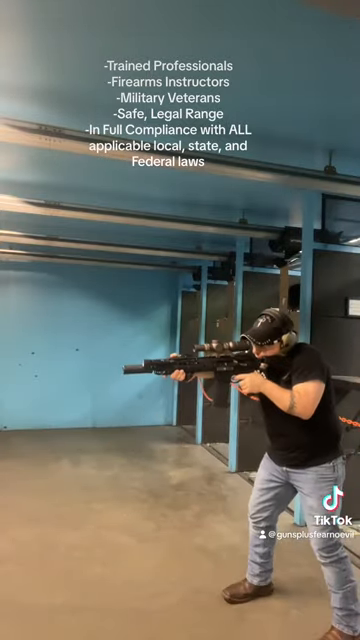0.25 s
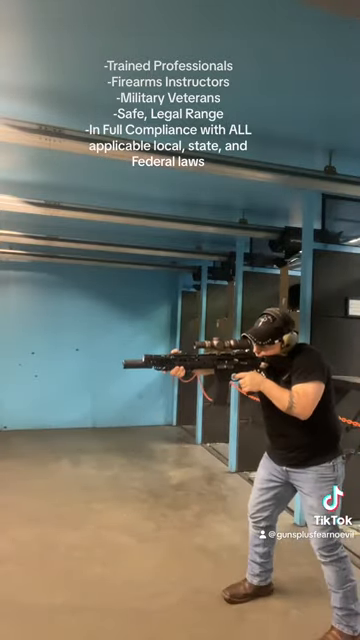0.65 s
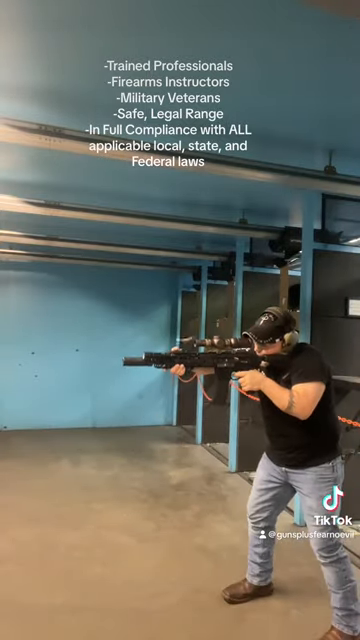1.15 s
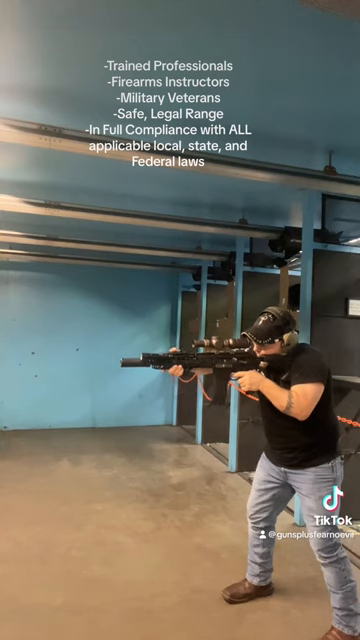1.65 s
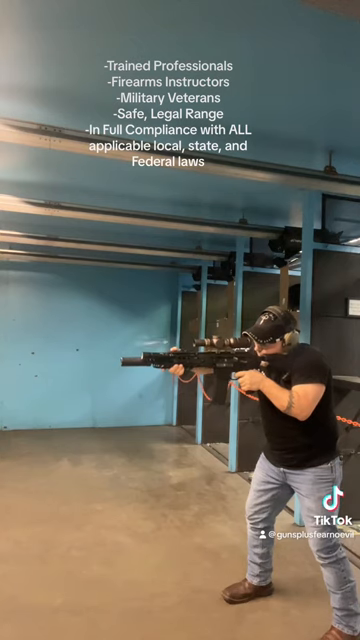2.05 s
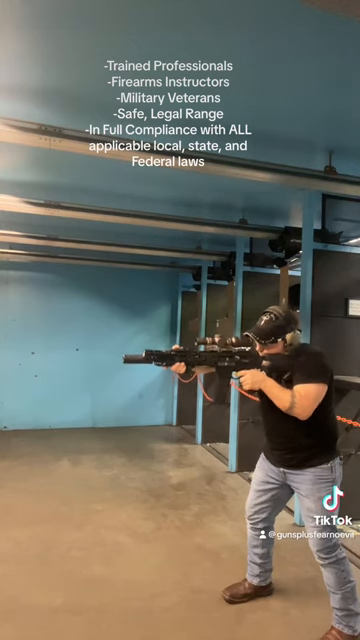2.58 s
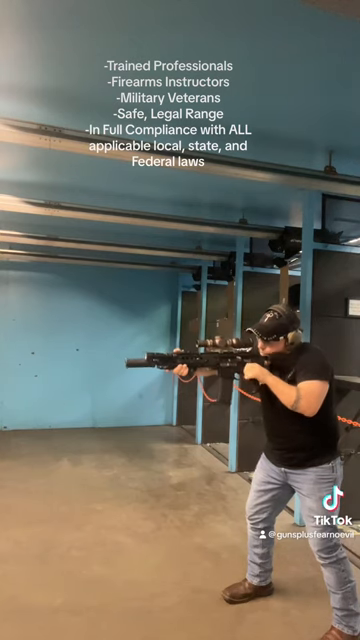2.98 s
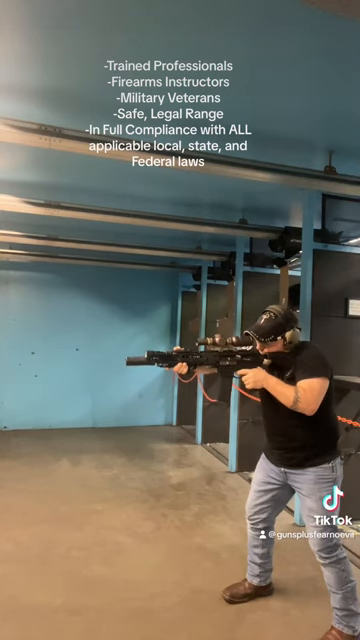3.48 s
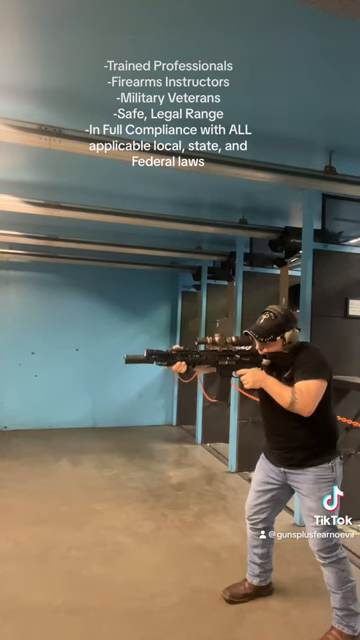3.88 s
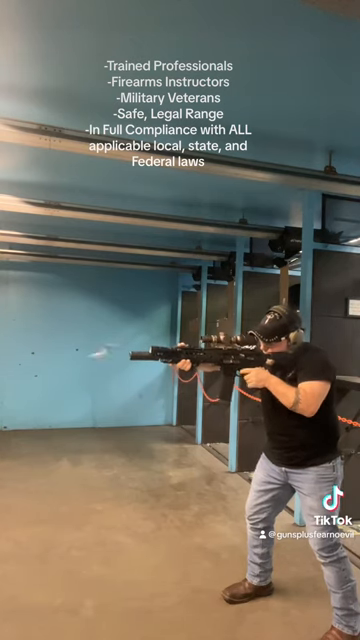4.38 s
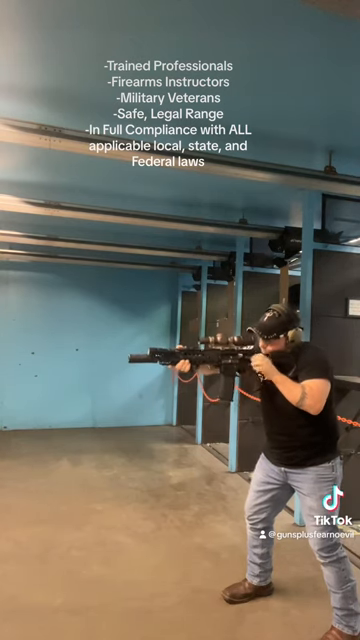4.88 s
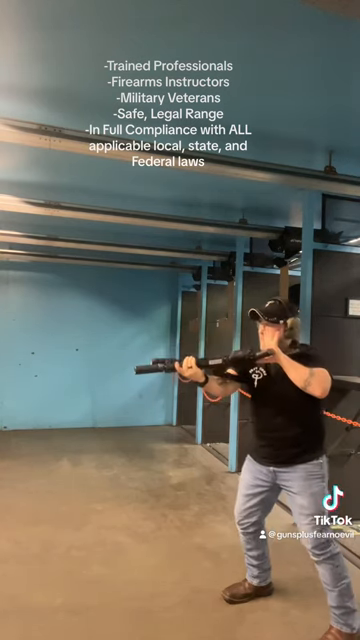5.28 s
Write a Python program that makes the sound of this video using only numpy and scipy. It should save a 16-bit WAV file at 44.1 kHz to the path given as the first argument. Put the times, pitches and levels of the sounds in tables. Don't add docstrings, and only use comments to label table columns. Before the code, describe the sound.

Six suppressed rifle shots in an enclosed concrete range, heard through one mono microphone with automatic gain. First come ventilation rumble and a fading bolt clack; the first crack cuts both to a faint hush. Four shots come roughly half a second apart, then after a longer gap two come close together. Dense echoes bloom and decay, metal baffles ring and beat, and high brass cases click and ping, most clearly near the end.

```python
import sys
import numpy as np
from scipy import signal
from scipy.io import wavfile

SR = 44100
rng = np.random.default_rng(int(sys.argv[2]) if len(sys.argv) > 2 else 0)


def log_audio(samples):
    frames = np.atleast_2d(samples).T
    limited = np.clip(frames, -1, 1)
    pcm = np.round(limited * 32767).astype(np.int16)
    wavfile.write(sys.argv[1], SR, pcm)


def gain_from_db(level_db):
    decades = np.asarray(level_db, float) / 20
    return 10 ** decades


N = 243736
MUZZLE_S = .99745
ECHO_LENGTH = 65000
ROUGH_AIR = rng.standard_normal((2, N))


def table(rows, hz):
    at, *columns = np.transpose(rows)
    return [np.interp(np.log(hz), np.log(at), column) for column in columns]


def rms_one(x):
    return x / np.sqrt(np.mean(x ** 2) + 1e-20)


def since(s):
    return np.maximum(np.arange(N) / SR - s, 0)


def add(out, s, sound):
    first = round(s * SR)
    out[first:first + len(sound)] += sound[:N - first]


def band_noise(low_hz, high_hz, white):
    return signal.sosfilt(signal.butter(2, [low_hz, high_hz], "band", fs=SR, output="sos"), white)


def bands():
    edges = 20 * 2 ** np.arange(0, 9.9, 1 / 3)
    for k, (low, high) in enumerate(zip(edges, edges[1:])):
        yield np.sqrt(low * high), band_noise(low, high, ROUGH_AIR[k % 2])


def colored(spectrum):
    return sum(gain_from_db(table(spectrum, hz)[0]) * noise for hz, noise in bands())


def narrow(hz, width_hz, size):
    r = np.exp(-np.pi * width_hz / SR)
    section = [1, 0, -1, 1, -2 * r * np.cos(2 * np.pi * hz / SR), r * r]
    noise = rng.standard_normal(size + 4000)
    return rms_one(signal.sosfilt([section, section], noise)[4000:])


def resonances(rows):
    return sum(gain_from_db(db) * narrow(hz, width_hz, N) for hz, width_hz, db in rows)


def tick(hz, wide, t60):
    t = np.arange(9000) / SR
    noise = band_noise(hz / wide, min(hz * wide, .45 * SR), rng.standard_normal(len(t)))
    return rms_one(noise) * (gain_from_db(-60 * t / t60) + gain_from_db(-17 - 60 * t / .33))


def gain_before_blast():
    return gain_from_db(-2500 * since(MUZZLE_S))


# pitch in Hz, level in dB per Hz.
FAN_RUMBLE = [(12, -45), (20, -13), (86, -0.5), (123, -4.5), (234, -13), (285, -23), (459, -24), (698, -33),
              (923, -33), (1060, -48), (1150, -35), (1660, -36), (2260, -40), (9950, -59.5), (16000, -74.5)]
# pitch in Hz, width in Hz, level in dB.
DUCT_HUMS = [(85.5, 4.2, -8.5), (130.2, 7.5, -11.5), (182.4, 16, -9), (204.7, 15, -12), (236.3, 6, -7),
             (885, 27, -31)]
# pitch in Hz, level in dB per Hz.
FAN_HUSH = [(18, -49), (30, -10), (92, -1), (123, -18), (198, 5.5), (257, -21), (334, -13), (636, -29.5),
            (1160, -7), (1300, -12), (1400, -5.5), (2250, -22.5), (9000, -51), (11700, -80.5),
            (19800, -120)]


def ventilation():
    rumble = gain_from_db(-3.0) * rms_one(colored(FAN_RUMBLE)) + resonances(DUCT_HUMS)
    return gain_before_blast() * gain_from_db(-40.5) * rumble + gain_from_db(-72.5) * rms_one(colored(FAN_HUSH))


# pitch in Hz, level in dB per Hz.
BOLT_NOISE = [(500, -27), (1100, -7), (1750, 0), (2300, 1), (3100, -4), (4300, -3), (5000, -5), (6000, -11),
              (7500, -8), (9000, -11.5), (11000, -12), (16000, -31)]
# pitch in Hz, width in Hz, level in dB.
BOLT_PARTS = [(1680, 59, -8), (1880, 36, -9), (4340, 110, -11), (5040, 190, -10), (6100, 200, -17.5),
              (7570, 250, -16), (8680, 90, -22)]


def bolt():
    t, echo = since(0)[:SR], 0
    for hz, noise in bands():
        fall_db = 60 * t / 0.65 * (hz / 3000) ** .15
        echo = echo + gain_from_db(table(BOLT_NOISE, hz)[0] - fall_db) * noise[:SR]
    echo = np.pad(echo, (0, N - SR)) / np.std(echo[:2000])
    rings = resonances(BOLT_PARTS) * gain_from_db(-60 * since(0) / 0.68)
    return gain_before_blast() * gain_from_db(-54.5) * (echo + rings)


CASE_HZ = (10700, 11790, 15200)
CASE_WIDTH_HZ = (260, 130, 230)
# start in seconds, tick level in dB, low, middle and top ring level in dB.
CASE_LANDINGS = [(1.677, -69, -95, -99, -62), (2.33, -105, -75, -99, -73), (2.36, -74, -78, -99, -70),
                 (2.887, -105, -76, -99, -75), (3.144, -69, -84, -99, -70), (3.184, -51, -84, -67, -55),
                 (3.586, -73.5, -89, -91, -69.5), (3.7744, -83, -88.5, -99, -79),
                 (4.48, -105, -95, -90, -76), (4.524, -46, -95, -83, -51), (4.723, -49.5, -95, -82, -90),
                 (4.8185, -52, -60, -88, -65), (4.955, -70, -75, -82, -65), (4.988, -110, -79, -87, -59),
                 (5.04, -110, -88, -80, -73), (5.214, -84, -76, -99, -73), (5.253, -68, -78, -99, -67),
                 (5.473, -78, -82, -99, -70)]
# start in seconds, level in dB, pitch in Hz.
CASE_SKIPS = [(3.13, -74, 10900), (3.603, -74, 9000), (4.541, -68, 10000), (4.727, -53, 11000),
              (4.969, -64, 12300), (5.2139, -69, 7500), (5.235, -76, 11500), (5.277, -73, 6530),
              (5.355, -70, 8000), (5.488, -73, 9950)]


def brass():
    out, t = np.zeros(N), np.arange(20000) / SR
    ends = [row[0] for row in CASE_LANDINGS[1:]] + [N / SR]
    for (s, tick_db, *rings_db), end in zip(CASE_LANDINGS, ends):
        stop_db = 2000 * np.maximum(t - end + s, 0)
        for hz, width_hz, level_db in zip(CASE_HZ, CASE_WIDTH_HZ, rings_db):
            t60 = .33 + .55 * gain_from_db(.65 * (-78 - level_db))
            swell = 1 - np.exp(-t / (0.0086 * t60 ** 2))
            add(out, s, swell * gain_from_db(level_db - 60 * t / t60 - stop_db) * narrow(hz, width_hz, len(t)))
        add(out, s, gain_from_db(tick_db) * tick(11800, 1.6, .005))
        ping_db = (tick_db + rings_db[-1]) / 2 + 15.5
        add(out, s, gain_from_db(ping_db - 60 * t / 0.014) * np.sin(2 * np.pi * CASE_HZ[-1] * t))
    for s, level_db, hz in CASE_SKIPS:
        add(out, s, gain_from_db(level_db) * tick(hz, 1.8, .005))
    return out


SHOT_TIMES = (.9975, 1.4222, 1.9117, 2.5138, 3.9487, 4.1286)
# level in dB, extra treble in dB, gain recovery in dB per second.
SHOT_LEVELS = [
    (-31, -2, 32),
    (-28, 0.1, 20),
    (-24, .6, 11),
    (-22, 0.16, 10.5),
    (-20.5, 1.5, -15),
    (-21.5, 0.15, 22),
]


def fire(hz, echoes):
    out, t = np.zeros(N), np.arange(ECHO_LENGTH) / SR
    released = np.clip(t - .1, 0, .35)
    for s, (level_db, treble_db, recovery), echo in zip(SHOT_TIMES, SHOT_LEVELS, echoes):
        add(out, s, gain_from_db(level_db + treble_db * hz / (hz + 2500) + recovery * released) * echo)
    return out


# pitch in Hz, level in dB,
# swell in seconds, time to fall by 60 dB in seconds.
BAFFLE_MODES = [(96.4, -23.5, .05, 0.99), (160.1, -12.5, .05, 0.81), (242, -9.5, 0.075, 0.39),
                (304.8, -5.5, 0.069, 0.85), (347.3, -2.5, 0.079, 0.54), (444.7, -16, 0.026, 1),
                (482, -13, .04, 0.91), (559.5, -18.5, 0.037, 1.4), (572.5, -10, 0.26, 1.096),
                (589, -13, 0.073, 0.83), (696, -16.5, 0.019, 0.99), (770, -21, 0.028, .9),
                (799, -17, .03, .6), (884, -17.5, .03, 0.45), (900, -14.5, 0.046, 0.55),
                (936, -21, 0.044, 0.31), (1104, -13, 0.052, .7), (1333, -17.5, 0.067, .7),
                (1490, -23, .03, 0.45)]
# pitch in Hz, level in dB, time to fall by 60 dB in seconds.
SHEET_MODES = [(238, -37, 2.4), (299, -32, 2), (349, -41.5, 2.92), (696, -38.5, 2.6), (790, -43, 2.4),
               (895, -43, 2.6), (951, -42, 3.5), (990, -39, 2.5), (1130, -41.5, 3.3), (1180, -41, 2.8),
               (1372, -42, 3.2)]


def baffles():
    t = np.arange(ECHO_LENGTH) / SR
    modes = [(hz, gain_from_db(db - 60 * t / t60) * (1 - np.exp(-(t / swell) ** 2)))
             for hz, db, swell, t60 in BAFFLE_MODES]
    modes += [(hz, gain_from_db(db - 60 * t / t60)) for hz, db, t60 in SHEET_MODES]
    out = 0
    for (hz, shape), (phase, twin_phase, apart) in zip(modes, rng.random((len(modes), 3))):
        twin_hz = hz + 6.035 * (.5 + apart / 2)
        tone = np.sin(2 * np.pi * (hz * t + phase))
        twin = gain_from_db(-7) * np.sin(2 * np.pi * (twin_hz * t + twin_phase))
        out = out + fire(hz, [shape * (tone + twin)] * len(SHOT_TIMES))
    return out


# pitch in Hz, time to fall by 60 dB in seconds, late level in dB,
# late time to fall by 60 dB in seconds.
HALL_DECAY = [(60, 0.42, -33, 3.5), (397, 0.84, -33.5, 2.6), (1400, .76, -28, 3.1), (2500, 0.87, -33.5, 4),
              (4800, 0.78, -26.5, 1.7), (9000, 0.55, -49.5, 2), (12500, 0.41, -55.5, 1.5),
              (16100, 0.42, -59, 1.1)]
# pitch in Hz, level in dB.
BEFORE_FAR_WALL = [(40, -14), (150, -5.5), (400, -1), (1400, -3.5), (2300, 3), (9000, -0.5)]


def hall(hz):
    t60, late_db, late_t60 = table(HALL_DECAY, hz)
    t = np.arange(ECHO_LENGTH) / SR
    plateau_s = 0.041 * (hz / 1000) ** -0.25
    fall = np.sqrt(t ** 2 + plateau_s ** 2) - plateau_s
    decay = np.hypot(gain_from_db(-60 * fall / t60), gain_from_db(late_db - 60 * t / late_t60))
    arrival_db = table(BEFORE_FAR_WALL, hz)[0] * (1 - np.tanh((t - .027) / 0.0043)) / 2
    bunch_db = 1.3 * np.exp(-((t - .03) / 0.039) ** 2)
    bite_db = -2.5 * np.exp(-t / 0.0079)
    return decay * gain_from_db(arrival_db + bunch_db + bite_db)


# pitch in Hz, level in dB per Hz.
BLAST_NOISE = [(20, -40), (35, -18), (90, -9), (250, -3), (420, -6), (750, -3.5), (1150, -6.5),
               (1520, -9.5), (1950, -17), (4200, -18.5), (7500, -19), (11000, -14), (13500, -21),
               (16000, -27)]


def blasts():
    out, spread = 0, 0
    for hz, noise in bands():
        level, shape = gain_from_db(table(BLAST_NOISE, hz)[0]), hall(hz)
        step = 30011 if hz > 1900 else 0
        starts = [20000 + k * step for k in range(len(SHOT_TIMES))]
        out = out + level * fire(hz, [noise[i:i + ECHO_LENGTH] * shape for i in starts])
        spread = spread + level * noise
    duck_db = -18 * np.exp(-since(MUZZLE_S) / .006)
    return gain_from_db(duck_db) * out / np.std(spread)


# pitch in Hz, level in dB, time to fall by 60 dB in seconds.
MUZZLE_CRACKLE = [(1750, -19, .006), (2800, -15, .004), (3900, -19, .004), (5200, -16, .004),
                  (7900, -17, .0035), (9500, -24, .002), (11300, -19, .003), (14500, -21, .0025)]


def muzzle():
    t = since(MUZZLE_S)
    crackle = 0
    for hz, db, t60 in MUZZLE_CRACKLE:
        sign = -1 if hz > 4000 else 1
        crackle = crackle + sign * gain_from_db(db - 60 * t / t60) * np.sin(2 * np.pi * hz * t)
    stretch = 1 + t / .0008
    swings = np.sin(2 * np.pi * np.log(stretch) / np.log(2.1)) / stretch ** .62
    front = gain_from_db(-14 - 60 * t / .3) * swings
    hiss = band_noise(2500, 14000, rng.standard_normal(N))
    ahead = (since(.9892) > 0) * gain_from_db(900 * np.minimum(np.arange(N) / SR - MUZZLE_S, 0))
    return front + crackle + hiss * ahead * gain_from_db(-28 - 9000 * t)


def cracks():
    out = np.zeros(N)
    for s, (level_db, *_) in zip(SHOT_TIMES[1:], SHOT_LEVELS[1:]):
        add(out, s, gain_from_db(level_db - 3.5) * tick(2800, 3.8, 0.013))
    return out


def scene():
    top = signal.cheby2(10, 40, 16000, fs=SR, output="sos")
    dulled = signal.sosfilt(top, ventilation() + bolt() + brass() + blasts())
    return (dulled + baffles() + muzzle() + cracks())[None]


def roll_off(x):
    return signal.sosfilt(signal.butter(12, 16850, fs=SR, output="sos"), x)


def record(dry):
    rounded = 0.62 * np.tanh(dry / 0.58)
    top = signal.cheby2(12, 60, 16700, fs=SR, output="sos")
    return roll_off(signal.sosfilt(top, rounded))


dry = scene()
out = record(dry)
log_audio(out)
```